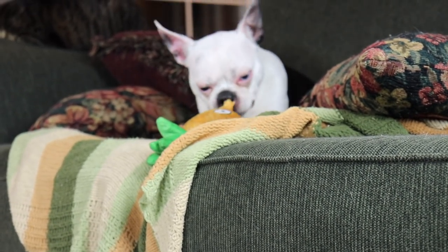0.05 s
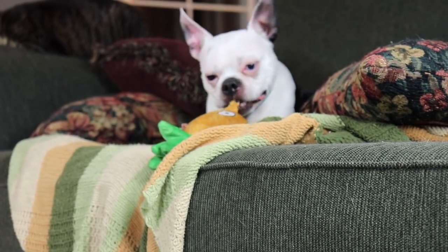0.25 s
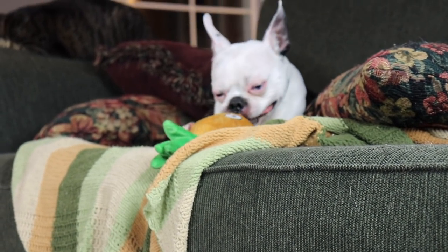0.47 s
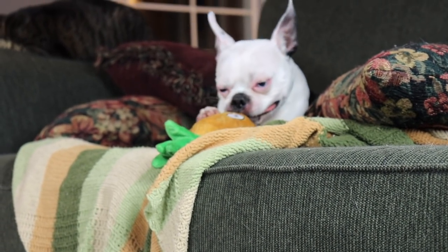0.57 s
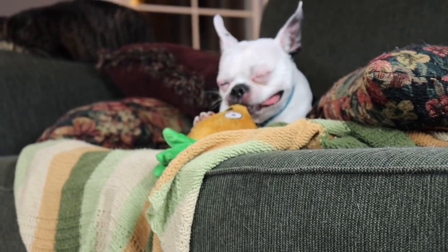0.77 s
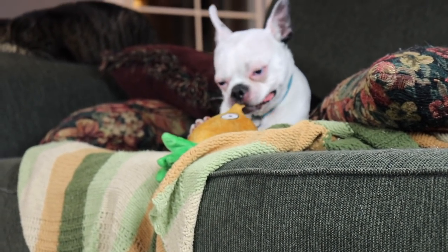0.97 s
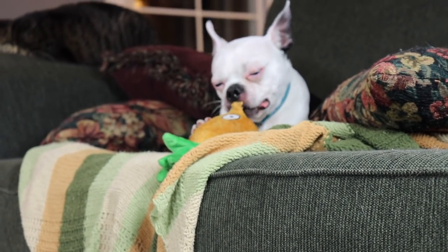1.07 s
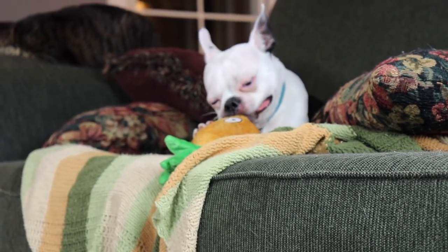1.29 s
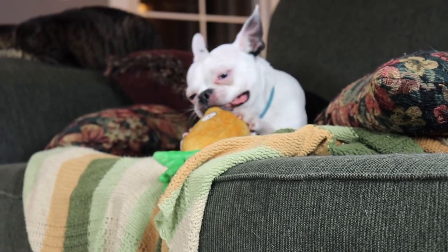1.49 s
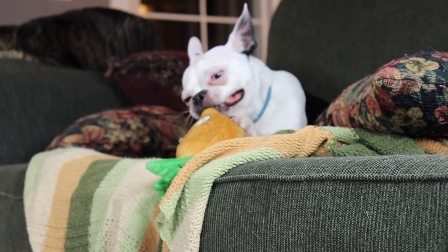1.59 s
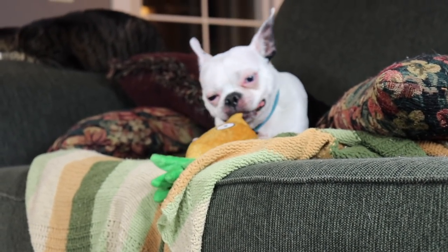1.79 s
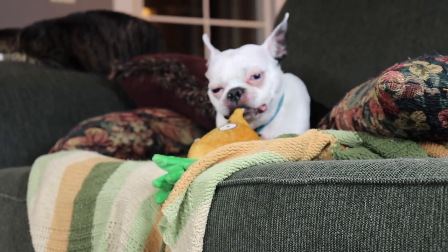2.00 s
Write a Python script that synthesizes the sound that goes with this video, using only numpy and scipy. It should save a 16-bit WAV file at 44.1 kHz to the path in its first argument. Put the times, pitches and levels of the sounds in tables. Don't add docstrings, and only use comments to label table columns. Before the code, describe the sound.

A dog's squeaky toy squeals twice, then pops and chirps briefly amid wet chewing and snorts

```python
import sys
import numpy as np
from scipy import signal
from scipy.fft import rfft, irfft
from scipy.io import wavfile
from scipy.ndimage import uniform_filter1d

SR = 44100
rng = np.random.default_rng(int(sys.argv[2]) if len(sys.argv) > 2 else 0)


def persist_wave(psi):
    counts = np.round(np.clip(psi, -1, 1) * 32767).astype(np.int16)
    wavfile.write(sys.argv[1], SR, np.atleast_2d(counts).T)


def undo_db(level):
    steps = np.asarray(level, float) / 20
    return 10 ** steps


N = 90404

# (time [s], pitch [Hz], level [dB], stall below pitch [0-1])
REED_SQUEEZES = [
    [(.178, 1290, -60, 0), (.188, 1310, -41, 0), (.203, 1340, -31, 0), (.242, 1410, -27.5, .004),
     (.262, 1510, -28, .03), (.278, 1840, -27.5, .22), (.302, 1850, -26, .1), (.34, 1840, -27.5, .3),
     (.372, 1700, -46, .3)],
    [(.695, 1235, -58, 0), (.712, 1266, -36.5, 0), (.778, 1330, -36.5, 0), (.79, 1348, -29.5, .005),
     (.828, 1435, -30, .01), (.856, 1468, -27, .02), (.872, 1445, -32, .04), (.892, 1380, -33, .05),
     (.91, 1300, -55, .06)],
]
# (frequency [Hz], level [dB])
TUBE_RESPONSE = [(1460, -3), (1750, -2.5), (2700, -4), (4000, -7.5), (5500, -5.5), (6800, -8), (8200, -17),
                 (15000, -36)]
# (time [s], peak level [dB], pitch [Hz], ring t60 [s], overtone level [dB])
BULB_POPS = [(.002, -32, 1575, 0.016, -10), (0.037, -51, 1872, 0.071, 0), (.408, -36, 2036, 0.011, 15),
             (0.491, -19.5, 1055, 0.01, 4.5), (0.495, -41.5, 1009, 0.028, 14.5),
             (.809, -36.5, 870, 0.04, 9.5), (.85, -28, 994, 0.042, 5.5), (1.057, -41, 895, 0.0093, 15),
             (1.069, -31, 990, 0.013, 6.5), (1.254, -38.5, 984, 0.017, 10), (1.271, -41.5, 1010, 0.013, 8),
             (1.446, -30.5, 1570, 0.01, -2), (1.461, -39, 1490, 0.052, -0.5),
             (1.607, -39.5, 1335, 0.02, -24), (1.589, -48.5, 1420, 0.046, -2),
             (1.69, -35.5, 950, 0.027, -6), (1.71, -35, 830, 0.014, -5), (2.043, -43.5, 920, 0.032, -0.5)]
# (start [s], length [s], peak level [dB], start pitch [Hz], end pitch [Hz])
BULB_HOOTS = [(1.2525, 0.0052, -31, 1370, 1200), (1.267, 0.0031, -26.5, 1100, 1250),
              (1.2705, 0.009, -28.5, 1280, 1430), (1.287, 0.0075, -34, 1140, 1300),
              (1.291, 0.014, -38.5, 1504, 1320), (1.305, 0.003, -48, 1250, 1300),
              (1.308, .009, -36, 1410, 1480), (1.338, 0.012, -43, 1360, 1230),
              (1.69, 0.017, -35.5, 451, 480), (1.711, 0.027, -34.5, 760, 896), (1.75, 0.026, -34, 796, 837),
              (1.775, 0.026, -37, 814, 742), (1.828, 0.031, -39, 854, 926), (1.748, 0.016, -34, 2240, 2340),
              (1.765, 0.021, -41.5, 2195, 2324), (.508, 0.015, -35, 994, 850),
              (.522, 0.0071, -34, 2920, 2940), (.536, 0.0099, -43, 3030, 3100),
              (.553, 0.0088, -44, 1066, 990)]
# (time [s], length [s], level [dB], pitch [Hz])
LIP_SMACKS = [(0.057, 0.0024, -48.5, 9800), (0.456, 0.048, -53, 10100), (0.664, 0.065, -58.5, 10400),
              (0.858, 0.01, -42, 11600), (1.055, 0.024, -45, 8000), (1.205, 0.027, -65.5, 9300),
              (1.245, 0.012, -46.5, 6850), (1.247, 0.016, -56, 13900), (1.405, 0.019, -62, 6300),
              (1.438, 0.015, -57, 10800), (1.447, 0.043, -44, 7580), (1.576, 0.026, -63.5, 7360),
              (1.676, 0.0056, -57, 5960), (1.708, 0.075, -64, 8900), (1.835, 0.023, -70, 9350),
              (2.043, .01, -57, 7350)]
# (start [s], length [s], level [dB], low pitch [Hz], high pitch [Hz])
NOSE_SNORTS = [
    (-.05, 0.09, -48.5, 1780, 3560),
    (.493, 0.062, -47, 1200, 3020),
    (1.04, 0.07, -43.5, 2510, 3200),
    (1.53, 0.044, -58.5, 1610, 4630),
    (1.705, 0.075, -41.5, 1420, 2410),
    (1.73, 0.094, -40, 2190, 2970),
    (1.77, 0.11, -42.5, 2580, 3700),
]
# (start [s], length [s], level [dB], start pitch [Hz], end pitch [Hz])
TEETH_WHISTLES = [(0, 0.056, -50.5, 1960, 1960), (.628, 0.075, -50, 2300, 2700),
                  (.66, .05, -53, 2700, 3050), (.635, 0.09, -49, 3500, 3800), (1.035, .06, -48, 2300, 2500),
                  (1.085, 0.045, -49.5, 2550, 2450), (1.045, .07, -50, 900, 950),
                  (1.901, 0.045, -55, 425, 425), (1.53, 0.06, -57, 5250, 5250),
                  (1.704, 0.11, -48, 6100, 6100), (1.708, 0.035, -64, 12800, 12800),
                  (1.812, 0.044, -59, 8400, 8400), (1.831, 0.037, -63, 11240, 11240),
                  (1.815, .045, -49, 4150, 4250), (1.85, .05, -52, 880, 860),
                  (1.455, .05, -60, 12500, 12000), (1.06, .05, -62, 12800, 12800),
                  (1.66, .04, -57, 430, 450), (1.72, .05, -51, 480, 520)]
# (time [s], peak level [dB], pitch [Hz], t60 [s])
TAG_STRIKES = [(.001, -44, 12740, 0.082), (.001, -42, 7800, 0.039), (.36, -43, 12840, 0.094),
               (0.641, -50.5, 11550, 0.16), (1.108, -82, 12800, .1), (1.29, -62, 15100, 0.09),
               (1.528, -52.5, 11550, 0.15), (1.535, -60, 12200, .06), (1.706, -28.5, 7800, 0.024),
               (1.875, -57, 12450, 0.15), (1.88, -51.5, 7800, 0.099)]
# (time [s], peak level [dB], pitch [Hz], t60 [s])
SOFT_BUMPS = [(0.098, -41, 172, 0.078), (.12, -56, 55, 0.24), (0.496, -36, 166.6, 0.095),
              (0.522, -29.5, 167, 0.069), (0.809, -48.5, 171, 0.12), (0.857, -51, 198, 0.21),
              (.9, -37, 40.5, 0.093), (0.911, -44.5, 139, 0.079), (1.799, -38, 270, 0.057),
              (1.28, -53, 43.4, 0.17), (1.34, -59, 45, 0.19), (1.411, -42.5, 175, 0.083),
              (1.42, -42, 35.7, 0.067)]
# (frequency [Hz], t60 [s])
ROOM_DECAY = [(200, 0.53), (1300, 0.42), (3500, 0.38), (7000, 0.33), (12000, 0.061)]
# (frequency [Hz], level [dB per Hz])
HUSH_SPECTRUM = [(15, -52), (25, -3.5), (433, -2.5), (1270, -9), (1750, -13), (2490, -17.5), (3000, -19),
                 (3630, -21.5), (15500, -37)]


def evened(x):
    return x / np.sqrt(np.mean(x ** 2) + 1e-20)


def read(points, hz):
    f, value = np.transpose(points)
    return np.interp(np.log(hz + 1), np.log(f + 1), value)


def add(mix, s, sound):
    at = round(s * SR)
    part = mix[max(at, 0):][:len(sound) + min(at, 0)]
    part += sound[max(-at, 0):][:len(part)]


def resonate(x, hz, width):
    q = max(hz / width, .3)
    return signal.lfilter(*signal.iirpeak(np.clip(hz, 20, SR / 2.2), q, SR), x)


def resonate_twice(x, hz, q):
    return resonate(resonate(x, hz, hz / q), hz, hz / q)


def drift(noise, seconds):
    size = max(round(seconds * SR), 1)
    return evened(uniform_filter1d(uniform_filter1d(noise, size), size))


def ring(hz, t60, rise):
    t = np.arange(0, t60, 1 / SR)
    return np.minimum(t / rise, 1) * undo_db(-60 * t / t60) * np.sin(2 * np.pi * hz * t)


def swell(length):
    return np.sin(np.pi * np.clip(np.arange(9000) / SR / length, 0, 1) ** 0.72)


def squeak(mix, rows):
    waver, fray, stall_s, flutter_db = .006, .05, .005, 1.8
    s, pitch, level, stall = np.transpose(rows)
    t = np.arange(s[0], s[0] + .3, 1 / SR)
    pitch_noise, flutter_noise, air_noise, stall_noise = rng.standard_normal((len(t), 4)).T
    db = np.interp(t, s, level, right=-120)
    stalling = np.interp(t, s, stall)
    slip = np.clip(stalling, 0, .3) * np.clip(abs(drift(stall_noise, stall_s)) - .5, 0, 1)
    jitter = (waver + fray * stalling) * drift(pitch_noise, .0015)
    hz = uniform_filter1d(np.interp(t, s, pitch), 200) * (1 + jitter - slip)
    turn = 2 * np.pi * np.cumsum(hz) / SR
    tone = np.zeros(len(t))
    for k in range(1, 13):
        audible = k * hz < 16000
        tone += undo_db(read(TUBE_RESPONSE, k * hz)) * np.cos(k * turn + k * k) * audible
    tube = undo_db(read(TUBE_RESPONSE, np.fft.rfftfreq(len(t), 1 / SR)))
    air = evened(irfft(rfft(air_noise) * tube, len(t)))
    air = resonate(resonate(air, 6000, 9000), 6000, 9000)
    air = air * undo_db(-17 + .6 * (db + 30))
    flutter = flutter_db * drift(flutter_noise, 0.0019)
    add(mix, s[0], undo_db(db + flutter) * (evened(tone) + air))


def pop(mix, s, db, hz, t60, over_db):
    overtone, split, rise, crack_db = 2.9, .06, .15 * t60, -10
    for share in (1 - split, 1 + split):
        add(mix, s, undo_db(db + 3) * ring(share * hz, t60, rise))
        add(mix, s, undo_db(db - 7.5 + over_db) * ring(share * overtone * hz, 0.81 * t60, rise / 2))
    crack = resonate(resonate(rng.standard_normal(900), 2 * hz, hz), 2 * hz, hz)
    decay_db = -60 * np.arange(900) / SR / t60
    add(mix, s, undo_db(db + over_db + crack_db + decay_db) * evened(crack))


def hoot(mix, s, length, db, hz, end_hz):
    steady_s, wobble, rasp_db = .012, .6, 3.5
    u = np.arange(0, length, 1 / SR) / length
    phase_noise, level_noise = rng.standard_normal((2000, 2)).T
    rough = min(length / steady_s, 1.5) ** 2 / 2
    glide = 2 * np.pi * length * (hz * u + (end_hz - hz) * u ** 2 / 2)
    turn = glide + rough * wobble * drift(phase_noise, .002)[:len(u)]
    grain_db = rough * rasp_db * (drift(level_noise, .002)[:len(u)] - .6)
    add(mix, s, undo_db(db + grain_db) * np.sqrt(np.sin(np.pi * u)) * np.sin(turn))


def smack(mix, s, length, db, hz):
    q, grain_db, clicks_per_s = 0.92, -4, 2100
    t = np.arange(4000) / SR
    chance, softness, noise = rng.random(4000), rng.exponential(1, 4000), rng.standard_normal(4000)
    clicks = (chance < clicks_per_s / SR) * undo_db(grain_db * np.minimum(softness, 4))
    spray = noise * (0.079 + clicks)
    pockets = sum(resonate(spray, min(p * hz, 15000), 930) for p in rng.uniform(0.46, 1.346, 4))
    spray = evened(resonate_twice(spray + 9.2 * pockets, hz, q))
    envelope = np.minimum(t / (0.21 * length), 1) * np.exp(-(t / length) ** 3.0)
    add(mix, s, undo_db(db) * spray * envelope)


def snort(mix, s, length, db, low_hz, high_hz):
    q, rasp_db = 2.6, 4.5
    noise, rasp = rng.standard_normal((9000, 2)).T
    air = noise * undo_db(rasp_db * drift(rasp, .0015))
    nose = evened(resonate_twice(air, low_hz, q))
    nose = nose + undo_db(-2) * evened(resonate_twice(air, high_hz, q))
    nose = nose + undo_db(-8) * evened(resonate_twice(air, 850, 6.2))
    add(mix, s, undo_db(db) * nose * swell(length))


def whistle(mix, s, length, db, hz, end_hz):
    a, b = rng.standard_normal((9000, 2)).T
    smooth = signal.butter(2, hz / 9.0 / 2, fs=SR)
    glide = np.interp(np.arange(9000) / SR, [0, length], [hz, end_hz])
    turn = 2 * np.pi * np.cumsum(glide) / SR
    air = signal.lfilter(*smooth, a) * np.cos(turn) + signal.lfilter(*smooth, b) * np.sin(turn)
    add(mix, s, undo_db(db) * evened(air) * swell(length))


def tag_strike(mix, s, db, hz, t60):
    add(mix, s, undo_db(db) * ring(hz, t60, .01))


def bump(mix, s, db, hz, t60):
    add(mix, s, undo_db(db) * ring(hz, t60, 1.26 / hz))


def room(x):
    gap_s = .004
    taps, at = np.zeros(SR), np.arange(0, SR - 20, 20)
    taps[at + rng.integers(0, 20, len(at))] = rng.choice([-1., 1.], len(at))
    hz, t, z = signal.stft(taps, SR, nperseg=256)
    decay = undo_db(-60 * t / read(ROOM_DECAY, hz)[:, None])
    tail = signal.istft(z * decay, SR, nperseg=256)[1]
    tail = np.r_[np.zeros(round(gap_s * SR)), tail]
    return signal.fftconvolve(x, tail / np.linalg.norm(tail))[:N]


def hush():
    hush_db, patchy_db, hum_hz, hum_db, low_cut_hz = -55, 2.5, 121.6, -72, 150
    frames, hz = N // 256 + 5, np.fft.rfftfreq(1024, 1 / SR)
    a, b, patches = rng.standard_normal((frames, 513, 3)).T
    patches = evened(uniform_filter1d(uniform_filter1d(patches, 10, 0), 12, 1))
    level_db = read(HUSH_SPECTRUM, hz)[:, None] + patchy_db * patches
    air = signal.istft((a + 1j * b) * undo_db(level_db), nperseg=1024, noverlap=768)[1]
    air = evened(air[:N])
    air = signal.lfilter(*signal.butter(2, low_cut_hz, "high", fs=SR), air)
    hum = np.sin(2 * np.pi * hum_hz * np.arange(N) / SR)
    hum = hum * undo_db(4.3 * drift(rng.standard_normal(N), 0.16))
    return undo_db(hush_db) * air + undo_db(hum_db) * hum


def scene():
    reed, bulb, near, low = np.zeros((4, N))
    for rows in REED_SQUEEZES:
        squeak(reed, rows)
    for source, mix, table in (
            (pop, near, BULB_POPS), (hoot, bulb, BULB_HOOTS), (smack, near, LIP_SMACKS),
            (snort, near, NOSE_SNORTS), (whistle, near, TEETH_WHISTLES),
            (tag_strike, near, TAG_STRIKES), (bump, low, SOFT_BUMPS)):
        for row in table:
            source(mix, *row)
    sent = undo_db(-1.5) * reed + undo_db(-8) * (near + undo_db(-7) * bulb)
    return (reed + near + bulb + room(sent) + low + hush())[None]


def roll_off(x):
    return signal.sosfilt(signal.butter(12, 16010, fs=SR, output="sos"), x)


def record(dry):
    return roll_off(dry)


dry = scene()
out = record(dry)
persist_wave(out)
```